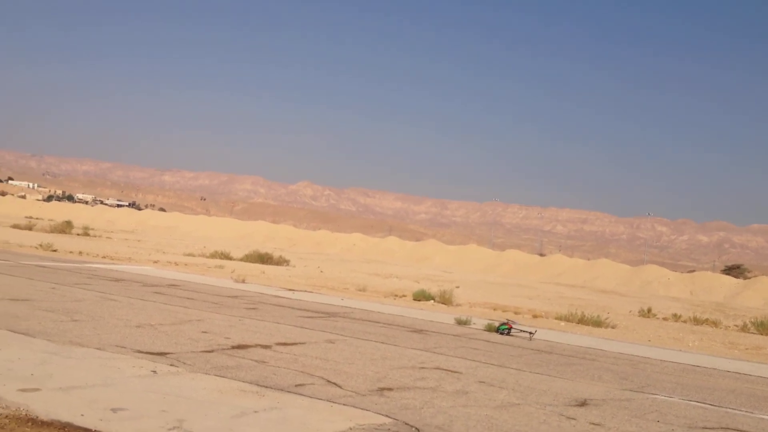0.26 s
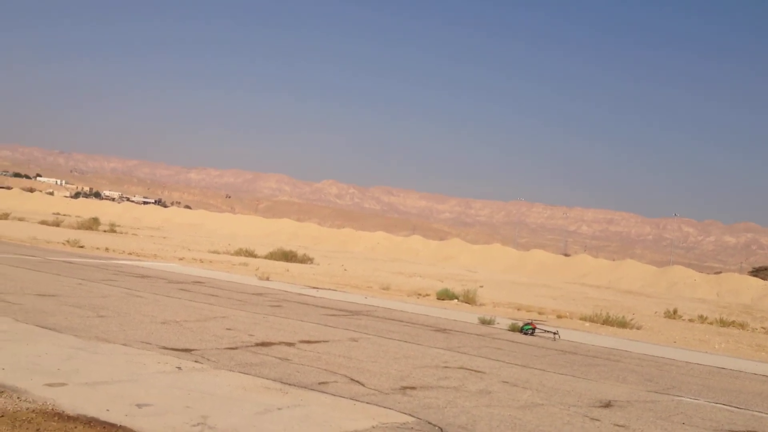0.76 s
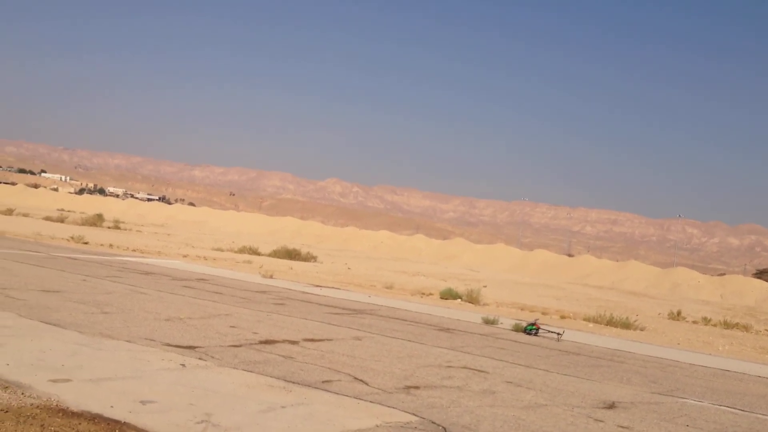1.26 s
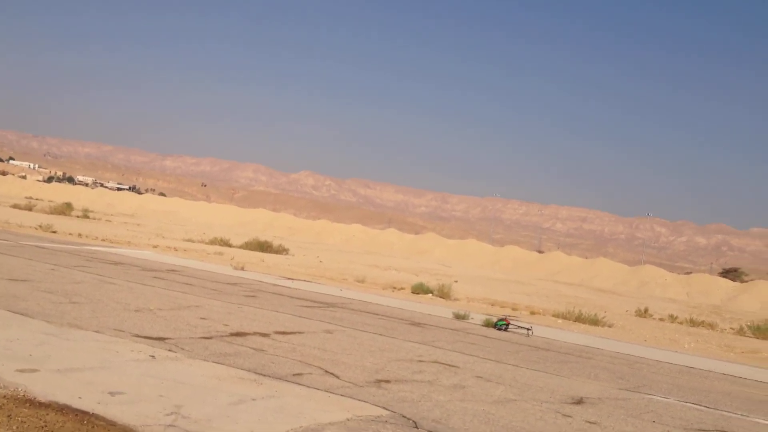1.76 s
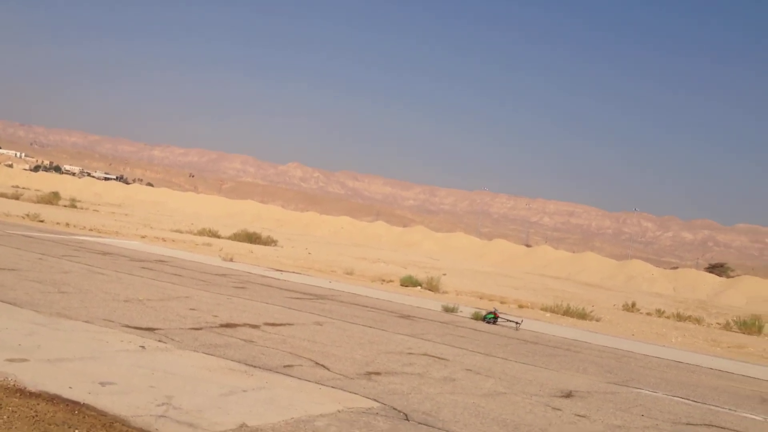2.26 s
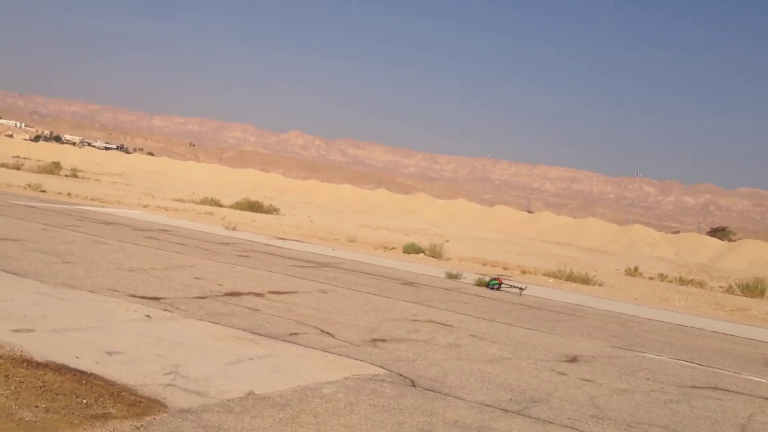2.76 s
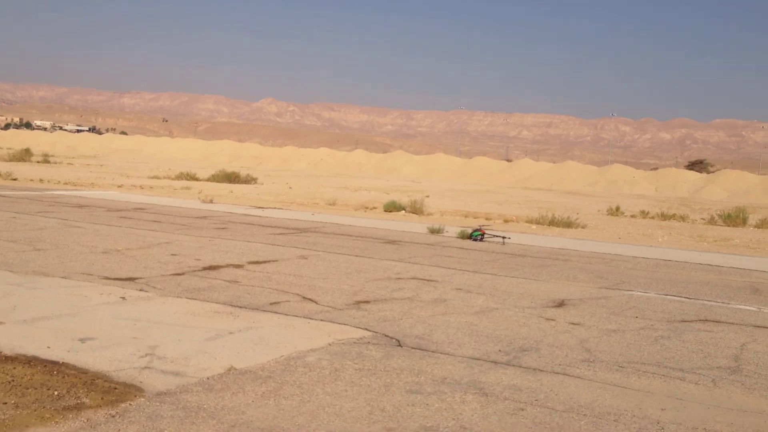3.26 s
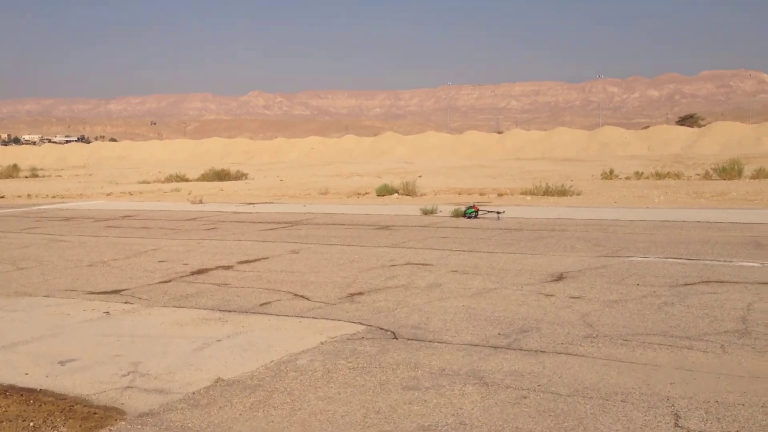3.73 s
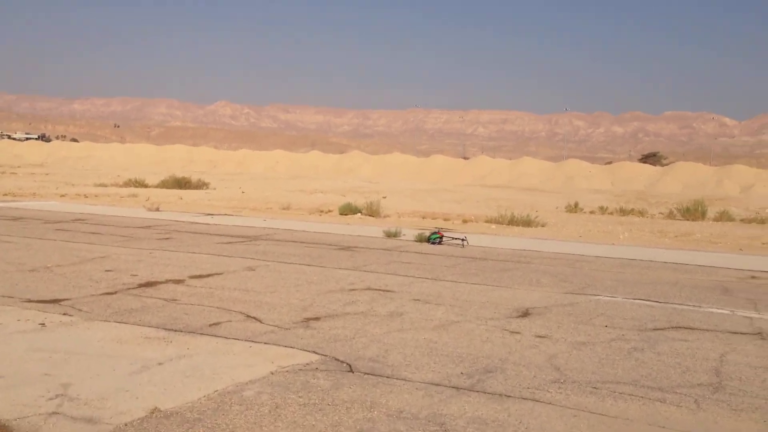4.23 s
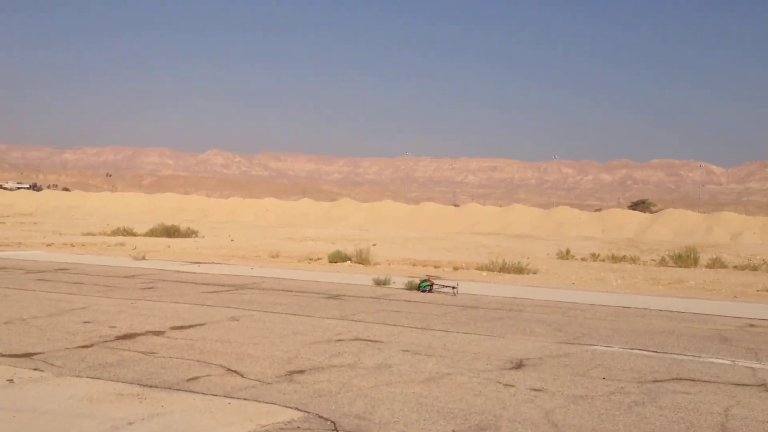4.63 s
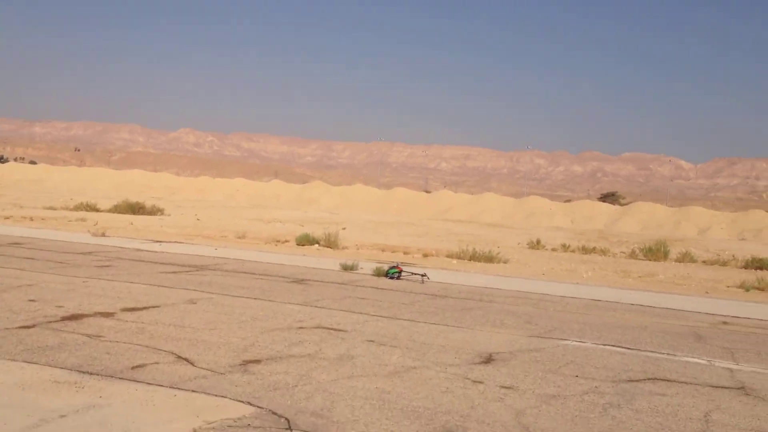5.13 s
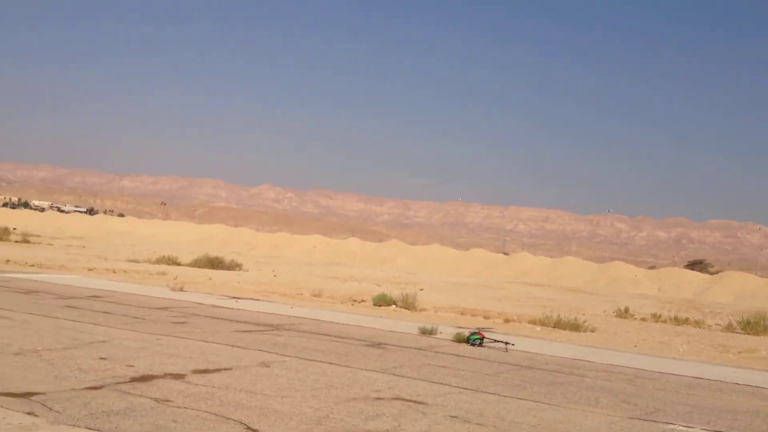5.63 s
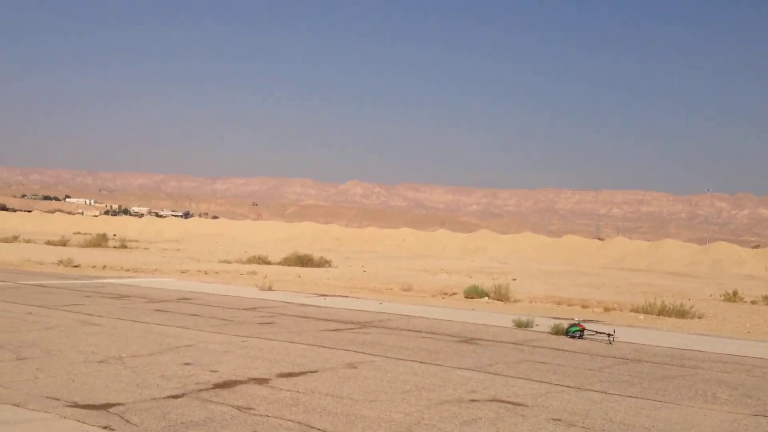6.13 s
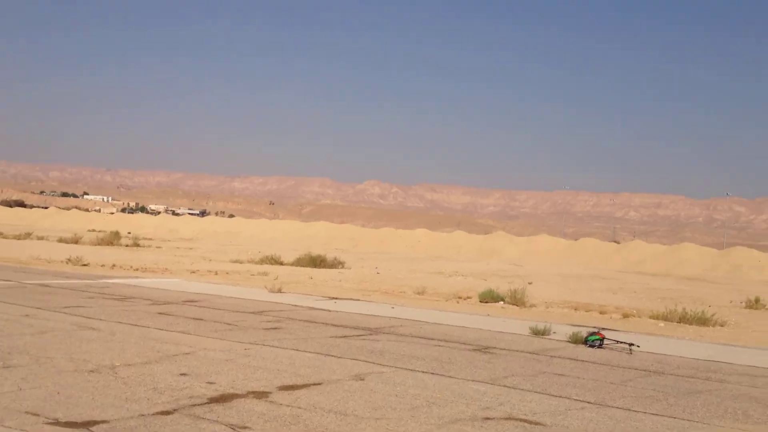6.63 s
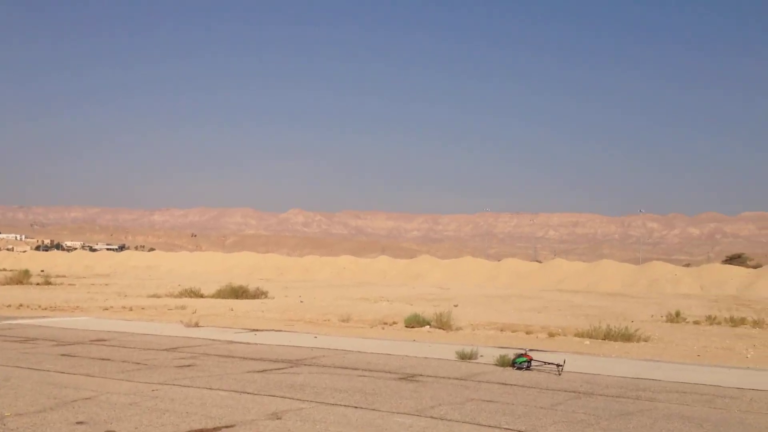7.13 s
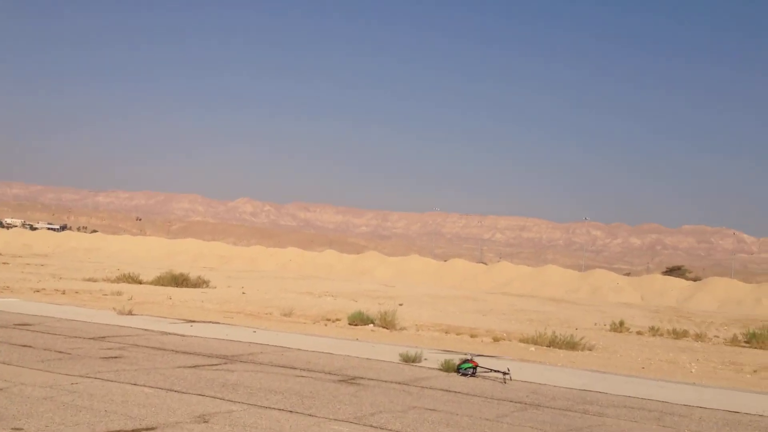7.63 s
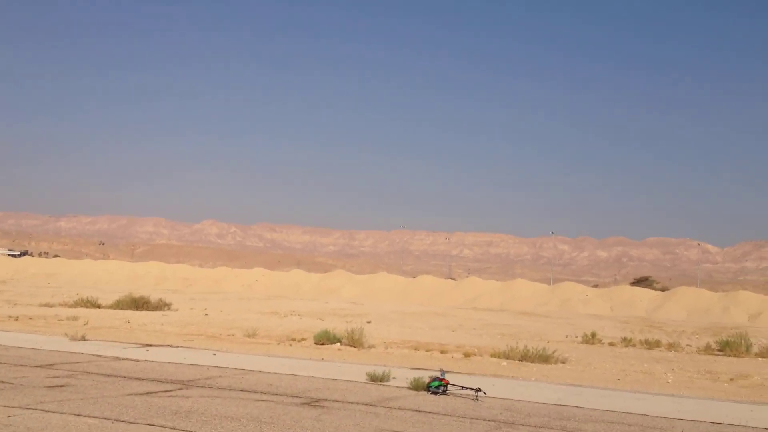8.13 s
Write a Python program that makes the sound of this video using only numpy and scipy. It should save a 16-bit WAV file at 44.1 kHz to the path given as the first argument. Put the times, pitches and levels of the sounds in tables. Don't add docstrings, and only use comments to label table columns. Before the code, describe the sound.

A steady, nasal model helicopter engine drone, heard across a runway, lasts two seconds, then clicks off and quickly dies. Quiet, quick rotor swishes follow, slowing slightly as freewheeling gears hum. Close to the microphone, wind bursts overwhelm everything with bassy thuds and ragged pops, strongest around the middle, easing near six seconds and returning at the end. Handling ticks and grit scuffs sit between gusts.

```python
import sys
import numpy as np
from scipy import signal
from scipy.fft import rfft, irfft, next_fast_len
from scipy.io import wavfile
from scipy.ndimage import map_coordinates

SR = 44100
rng = np.random.default_rng(int(sys.argv[2]) if len(sys.argv) > 2 else 0)


def wav_record(signal):
    frames = np.transpose(np.atleast_2d(signal))
    bounded = np.clip(frames, -1, 1)
    quanta = np.round(bounded * 32767).astype(np.int16)
    wavfile.write(sys.argv[1], SR, quanta)


def elevation(decibels):
    levels = np.asarray(decibels, float)
    return 10 ** (levels / 20)


N = 369998
T = np.arange(N) / SR

# time_s, level_db
ENGINE_LEVEL = [
    (0, -33.5),
    (.8, -32.5),
    (1.6, -34),
    (2.22, -34),
    (2.36, -37),
    (2.44, -43),
    (2.5, -50),
    (2.62, -55),
    (2.78, -78.5),
]
# frequency_hz, level_db (per Hz)
EXHAUST_COLOUR = [(40, -62.5), (90, -26.5), (200, -20), (330, -14.5), (900, -16.5), (1800, -6.5),
                  (3400, -7), (4500, -20), (6200, -20.5), (8200, -31), (9500, -40.5), (12500, -43),
                  (15500, -44)]
# centre_hz, width_hz, lift_db
BODY_RESONANCES = [(482, 130, 9), (678, 160, 6.5), (1157, 234, 14.5), (1975, 47, 6.5), (2545, 170, 9),
                   (4300, 200, 2.5),
                   (2536, 35, 7), (5465, 90, 6), (5850, 70, 6), (6260, 45, 12)]
# multiple (a plain number), level_db (against the engine)
FIRING_TONES = [(1, -36), (2, -26), (8, -22), (14, -22)]
# frequency_hz, level_db (per Hz)
BLADE_COLOUR = [(500, -35.5), (900, -3.5), (1700, 3.5), (2900, -2.5), (5000, -8), (7300, -11), (8300, -18),
                (10000, -30), (15500, -41.5)]
# centre_hz, width_hz, lift_db
GEAR_RESONANCES = [
    [(1270, 160, 19), (1770, 150, 23), (2500, 200, 20), (3500, 260, 20)],
    [(1310, 140, 21), (2020, 160, 20), (2550, 200, 21), (3560, 240, 19)],
]
# centre_hz, width_hz, depth_db
GROUND_NOTCHES = [(570, 110, -13), (1460, 260, -16), (2245, 640, -42), (3080, 220, -17), (3800, 320, -28),
                  (4610, 240, -25), (9500, 300, -22)]
# time_s, frequency_factor (ratio), depth_share (0-1)
LISTENER_PATH = [
    (0, .995, 0.8),
    (.8, 1.003, 0.7),
    (1.3, 0.99, 0.9),
    (2, 1, 0.7),
    (2.6, 0.963, 0.4),
    (3.4, .95, 0.07),
    (4.3, .98, .25),
    (5.5, 1.02, 0.14),
    (8.4, 1.06, 0.12),
]
# time_s, buffet_db, raggedness_db
GUSTS = [(2.66, -61.5, 2.5), (2.99, -45, -1.5), (3.32, -23, -2), (3.56, -31, -7), (3.86, -22.5, -4),
         (4.08, -18.5, -0.5), (4.2, -28, -4.5), (4.57, -26, -3.5), (4.91, -30, 2), (5.25, -31.5, 3),
         (5.37, -18.5, 7), (5.69, -31, 8), (6.2, -47.5, 1.5), (6.75, -48.5, 0), (7.4, -36.5, 2),
         (7.66, -35.5, 5), (7.93, -41, 2.5), (8.2, -23, 3.5)]
# frequency_hz, level_db (per Hz)
BUFFET_COLOUR = [(12, -76.5), (20, -50), (43, -29), (106, -3.5), (156, 2.5), (222, -2), (357, -16),
                 (406, -24), (447, -24.5), (900, -53.5), (1170, -82), (1980, -120)]
# frequency_hz, level_db (per Hz)
EDGE_COLOUR = [(120, -41), (280, 10.5), (400, 1), (700, -15.5), (1200, -31.5), (2500, -66.5), (5000, -110)]
# time_s, thud_db, ring_hz, snap_db (against thud), crack_db (against thud)
SHARP_POPS = [(3.889, -10, 186, -9.5, -33), (4.02, -9.5, 181, -13, -24.5), (4.276, -15.5, 189, -3, -20),
              (4.337, -19.5, 223, -2.5, -18), (4.483, -15.5, 143, -11, -27.5), (4.524, -5, 177, -6.5, -15),
              (4.551, -10.5, 162, -13.5, -32), (4.658, -12.5, 163, -6.5, -19.5),
              (3.963, -18, 200, -5.5, -22), (5.002, -18.5, 162, -8, -24), (5.184, -9, 242, -7.5, -19.5),
              (5.294, -5, 250, -12.5, -21), (5.356, -.5, 217, -7, -23), (5.397, -5.5, 213, 0.9, -37),
              (5.511, -20, 125, 2.5, -30.5), (7.025, -15.5, 170, -7.5, -19.5),
              (7.404, -16.5, 318, -11, -33), (7.649, -14.5, 211, -8, -43), (7.876, -12.5, 192, -12, -32),
              (4.782, -21, 216, -1, -30), (8.033, -20.5, 124.5, -7.5, -17), (8.147, -7.5, 240, -5, -9.5),
              (8.274, -14.5, 154, -1, -39), (8.355, -21.5, 282, 2.5, -14.5)]
# time_s, thud_db, ring_hz
DULL_THUDS = [(2.766, -36.5, 152), (2.955, -26, 182), (3.155, -20.5, 145.5), (3.245, -13.5, 165),
              (3.336, -10.5, 175), (3.406, -16, 191), (3.767, -9.5, 170), (3.856, -11, 163),
              (3.929, -11, 156), (3.369, -13, 167), (4.042, -9.5, 176.5), (4.114, -9.5, 192.6),
              (4.603, -18, 155.7), (4.726, -11.5, 137.7), (5.11, -13.5, 164.4), (5.333, -7, 196),
              (5.444, -6, 168), (5.478, -9.5, 319), (5.564, -10, 243), (5.919, -22, 173),
              (5.968, -19, 153.6), (6.398, -31.5, 178), (6.483, -23.5, 167), (6.695, -29, 158),
              (7.287, -18, 151), (7.359, -17.5, 133), (7.5, -16.5, 162), (7.985, -16.5, 217),
              (8.187, -5.5, 204), (8.236, -12.5, 200)]
# time_s, peak_db, centre_hz, width_hz
TICK_EVENTS = [(2.010, -34, 12990, 5780), (2.030, -35.5, 13000, 5000), (2.0316, -14, 3230, 1500),
               (2.0315, -20, 5030, 2500), (2.011, -24, 4000, 5000), (4.162, -38, 900, 900),
               (4.527, -43, 1790, 1500), (4.849, -49.5, 5000, 9000), (4.849, -32, 1300, 1500),
               (5.0062, -49, 4970, 7000), (5.022, -50, 4970, 6000), (5.26, -42, 1490, 2500),
               (5.8049, -38.5, 6000, 2510), (5.9565, -34, 1820, 1800), (6.084, -49, 6040, 2000),
               (6.17, -39, 2180, 2200), (6.170, -40, 5650, 8930), (6.4547, -38, 1690, 3000),
               (7.043, -42, 4000, 9000), (7.7265, -34.5, 5040, 2500), (7.733, -42, 5200, 2500),
               (8.056, -43, 1300, 1500), (8.146, -36, 2000, 1800), (5.258, -44, 800, 900),
               (8.126, -43, 2000, 2500), (8.386, -49, 5000, 14000)]
# centre_s,
# half_length_s, level_db, low_resonance_hz, high_resonance_hz
SCUFF_EVENTS = [(2.378, .028, -45, 1650, 1700), (4.789, 0.04, -53.5, 4500, 1230),
                (5.281, 0.022, -58, 4900, 7100), (5.904, .026, -61.5, 4830, 6900),
                (6.39, 0.036, -56.5, 900, 4800), (6.882, .02, -60, 4760, 6940),
                (6.945, 0.009, -57.5, 5950, 12000), (7.003, 0.028, -51.5, 4800, 7000),
                (7.838, 0.046, -54.5, 4600, 2230), (8.025, 0.022, -58.5, 4700, 2400),
                (8.142, .028, -56.5, 1080, 1500)]
# frequency_hz, level_db (per Hz)
HISS_COLOUR = [(290, -35), (500, 4), (1270, 0), (1410, -6.5), (2010, -0.5), (2260, 3), (3530, -29),
               (9930, -22), (15500, -18.5)]
# frequency_hz, gain_db
MIC_RESPONSE = [(15, -29), (40, -19), (70, -1), (110, 1), (15300, 0), (15600, -41)]

IDLE_HZ, LAST_HZ = 84, 28
STALL_S, SAG_HZ_PER_S = 2.06, 120
FIRST_PASS_S = 2.625
PASS_GAP_S, GAP_GROWS = .1555, .0222
DULL_CRACK_DB = -42


def unit(x):
    return x / np.sqrt(np.mean(x ** 2) + 1e-20)


def along(points, hz):
    f, v = np.transpose(points)
    return np.interp(np.log(hz + 1), np.log(f + 1), v)


def bumps(modes, hz):
    return sum(db / (1 + (2 * (hz - centre) / width) ** 2) for centre, width, db in modes)


def curves(rows):
    s, *cols = np.transpose(rows)
    return [np.interp(T, s, c) for c in cols]


def wobble(rate):
    return map_coordinates(rng.standard_normal(int(N * rate / SR) + 4), [T * rate])


def coloured(x, colour_db):
    m = next_fast_len(len(x) + 8192)
    gain = elevation(colour_db(np.fft.rfftfreq(m, 1 / SR)))
    return unit(irfft(rfft(x, m) * gain, m)[:len(x)])


def noise_of(colour_db):
    return coloured(rng.standard_normal(N), colour_db)


def burst(t, hz, rise):
    u = np.clip(1 + t / rise, 0, None)
    return (u * np.exp(1 - u)) ** 2 * np.cos(2 * np.pi * hz * t)


def engine():
    level_db, = curves(ENGINE_LEVEL)
    rate = np.clip(IDLE_HZ - SAG_HZ_PER_S * (T - STALL_S), LAST_HZ, IDLE_HZ)
    turns = np.cumsum(rate * (1 + .007 * wobble(5) + .008 * wobble(40))) / SR
    stroke = elevation(0.89 * rng.standard_normal(int(turns[-1]) + 2))[turns.astype(int)]
    puff = (1.1 + np.exp(-3 * (turns % 1))) * stroke * rng.standard_normal(N)
    kick = np.diff(np.floor(turns), prepend=0) * stroke

    rattle = elevation(-60 * T[:1300] / .035) * rng.standard_normal(1300)
    drive = unit(puff) + .4 * unit(signal.fftconvolve(kick, rattle)[:N])
    roar = coloured(drive, lambda hz: along(EXHAUST_COLOUR, hz) + bumps(BODY_RESONANCES, hz))

    t = T[:1500]
    ring = elevation(-60 * t / .014) * np.sin(2 * np.pi * 430 * t) * t
    thump_db = -25 + 40 * np.clip(T - STALL_S, 0, .33) + 1.6 * wobble(30)
    thump = elevation(thump_db) * unit(signal.fftconvolve(kick, ring)[:N])

    tones = sum(elevation(db - 6 + 1.5 * wobble(6.8)) * np.sin(2 * np.pi * multiple * turns)
                for multiple, db in FIRING_TONES)
    return elevation(level_db + 0.22 * wobble(15)) * (roar + tones + thump)


def rotor():
    since = T - FIRST_PASS_S
    passes = np.log(1 + GAP_GROWS * since / PASS_GAP_S) / GAP_GROWS
    swell_depth = np.interp(T, [2.5, 4.5, 8.4], [4.5, 4.2, 2.8])
    swell_db = -swell_depth * np.tanh(1.4 - 1.7 * np.cos(2 * np.pi * passes))
    swell_db += 1.6 * wobble(70)
    fade_in_db = 30 * np.minimum(since / 0.32, 0)
    level_db = -58.5 - 0.56 * since + 0.6 * wobble(4.6) + fade_in_db
    swish = noise_of(lambda hz: along(BLADE_COLOUR, hz))

    far, near = (noise_of(lambda hz: bumps(body, hz) - 40 * (abs(hz - 2400) > 2000))
                 for body in GEAR_RESONANCES)
    turn = np.interp(T, [4.2, 5.2], [0, np.pi / 2])
    hum = np.cos(turn) * far + np.sin(turn) * near
    hum_db = np.interp(T, [2.5, 3.2, 5.5, 8.4], [-55, -64.0, -65.0, -72.5])
    hum_db = hum_db + 0.5 * swell_db + 2.4 * wobble(23)
    gears = elevation(hum_db) * np.clip((T - 2.2) / 0.57, 0, 1) * hum
    return elevation(level_db + swell_db) * swish + gears


def asphalt(x):
    hz, t, z = signal.stft(x, SR, nperseg=2048)
    s, factor, share = np.transpose(LISTENER_PATH)
    depth = np.clip(np.interp(t, s, share), 0, 1)
    shift = np.interp(t, s, factor) * (1 + .003 * np.interp(t, T, wobble(4)))
    for centre, width, db in GROUND_NOTCHES:
        off = (2 * (hz[:, None] - centre * shift) / width) ** 2
        z = z * np.sqrt((off + elevation(2 * db * depth)) / (off + 1))
    return signal.istft(z, SR, nperseg=2048)[1][:N]


def swirls(buffet_db, ragged_db):
    dull = [(s, db, hz, -18 + ragged_db[int(s * SR)], DULL_CRACK_DB) for s, db, hz in DULL_THUDS]
    stray = []
    for s, (a, b, c) in zip(rng.uniform(2.9, 8.3, size=40), rng.standard_normal(size=(40, 3))):
        i = int(s * SR)
        thud_db = buffet_db[i] + 6 + 5 * a
        snap_db = -14 + ragged_db[i] + 2 * c
        stray.append((s, thud_db, 170 * np.exp(0.17 * b), snap_db, DULL_CRACK_DB + 5.5))
    return SHARP_POPS + dull + stray


def wind():
    buffet_db, ragged_db = curves(GUSTS)
    lumps = wobble(35)
    body = coloured(elevation(0.98 * lumps) * rng.standard_normal(N), lambda hz: along(BUFFET_COLOUR, hz))
    spikes = elevation(2.5 * lumps + 4.5 * wobble(120)) * rng.standard_normal(N)
    edge = coloured(spikes, lambda hz: along(EDGE_COLOUR, hz))

    sharp = elevation(-45 + 1.03 * (buffet_db + 28.5) + ragged_db + 1.5 * wobble(12))
    for s, db, hz, snap_db, _ in SHARP_POPS:
        sharp = sharp + elevation(db + snap_db - 13.5) * np.exp(-abs(T - s) / 0.026)
    onset = np.clip((T - 2.2) / 0.23, 0, 1)
    rumble = elevation(buffet_db + 1.5 + 1.4 * wobble(7)) * body
    out = np.pad(onset * (rumble + sharp * edge), (0, SR))

    t = T[:SR // 12] - .015
    for s, db, hz, snap_db, crack_db in swirls(buffet_db, ragged_db):
        thud = elevation(-2.0) * burst(t - .001, hz, 0.0045)
        snap = elevation(snap_db) * burst(t, 402, 0.0016)
        crack = elevation(crack_db - 3.0) * burst(t, 900, 0.0011)
        out[round((s + t[0]) * SR):][:len(t)] -= elevation(db) * (thud + snap + crack)
    return out[:N]


def ticks():
    out, t = np.zeros(N + SR), T[:SR // 40]
    for s, db, hz, width_hz in TICK_EVENTS:
        ring = coloured(rng.standard_normal(len(t)),
                        lambda f: -40 * np.log10(1 + (1.7 * (f - hz) / width_hz) ** 2))
        fall = elevation(db - 3 - 20 * t / 0.0044)
        out[round(s * SR):][:len(t)] += fall * (1 - np.exp(-t / .00015)) * ring
    return out[:N]


def scuffs():
    out, t = np.zeros(N + SR), T[:SR // 3] - 1 / 6
    sole = [(300, -50), (900, 10.5), (7500, -4.5), (9500, -20)]  # Hz, dB
    for s, half, db, low_hz, high_hz in SCUFF_EVENTS:
        grains = 3.2 * rng.standard_normal(len(t) // 60 + 1).repeat(60)[:len(t)]
        grit = rng.standard_normal(len(t)) * elevation(grains)
        hollows = [(low_hz, 1100, 14), (high_hz, 1100, 10)]
        crunch = coloured(grit, lambda f: bumps(hollows, f) + along(sole, f))
        slide = np.exp(-.5 * (t / half) ** 2)
        out[round((s - 1 / 6) * SR):][:len(t)] += elevation(db) * slide * crunch
    return out[:N]


def hiss():
    return elevation(-63) * noise_of(lambda hz: along(HISS_COLOUR, hz))


def scene():
    distant = asphalt(engine() + rotor() + hiss())
    return (distant + wind() + ticks() + scuffs())[None]


def top_cut(x):
    return signal.sosfilt(signal.butter(12, 15680, fs=SR, output="sos"), x)


def record(dry):
    m = next_fast_len(N + 8192)
    response = elevation(along(MIC_RESPONSE, np.fft.rfftfreq(m, 1 / SR)))
    heard = irfft(rfft(dry, m) * response, m)[:, :N]
    drift = elevation(-67.5) * np.clip(T - 2, .06, 1) * noise_of(lambda hz: -60 * (hz > 60))
    mix = heard + drift
    limited = mix / (1 + abs(mix) ** 8) ** (1 / 8)
    return top_cut(limited)


dry = scene()
out = record(dry)
wav_record(out)
```